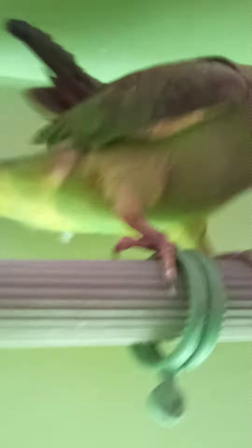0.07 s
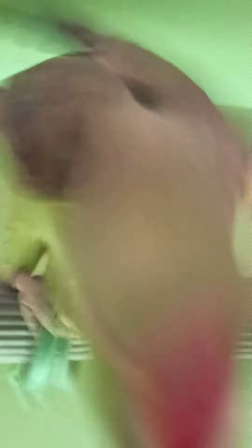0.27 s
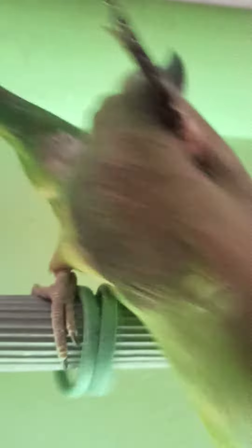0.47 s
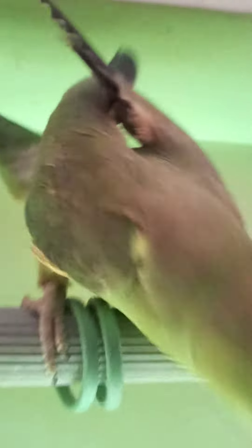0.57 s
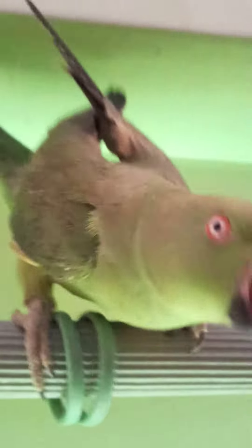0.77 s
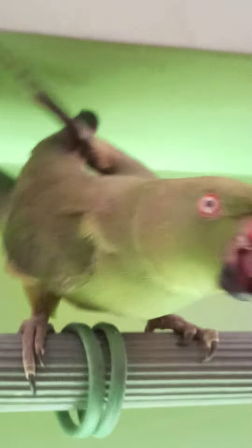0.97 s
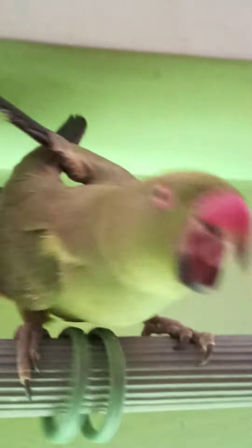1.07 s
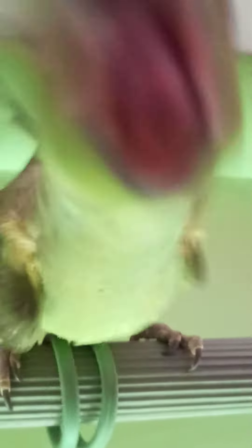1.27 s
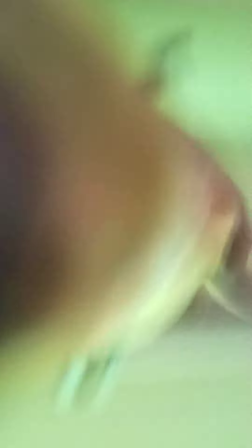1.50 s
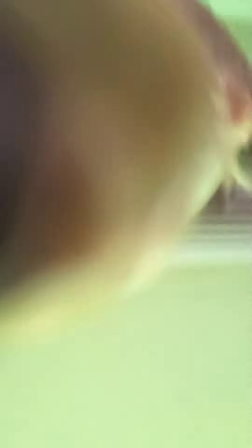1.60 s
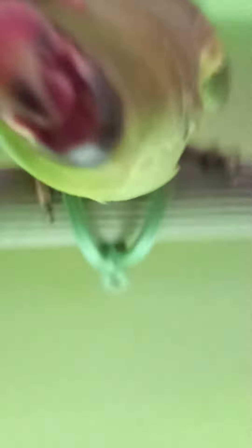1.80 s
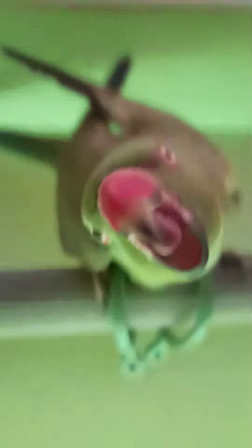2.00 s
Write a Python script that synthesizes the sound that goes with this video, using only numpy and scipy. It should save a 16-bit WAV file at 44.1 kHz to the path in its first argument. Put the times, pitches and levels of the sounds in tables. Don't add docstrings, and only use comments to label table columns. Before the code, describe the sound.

A parrot screeches raspily once, then its beak raps and scratches the microphone's casing in bursts

```python
import sys
import numpy as np
from scipy import signal
from scipy.fft import rfft, irfft, next_fast_len
from scipy.io import wavfile
from scipy.ndimage import map_coordinates

SR = 44100
rng = np.random.default_rng(int(sys.argv[2]) if len(sys.argv) > 2 else 0)


def file_out(sig):
    cols = np.atleast_2d(sig).T
    lim = np.clip(cols, -1, 1)
    pcm = np.round(lim * 32767).astype(np.int16)
    wavfile.write(sys.argv[1], SR, pcm)


def nominal_scale(level):
    x = np.asarray(level, float) / 20
    return 10 ** x


N = 90404


def unit(x):
    return x / np.sqrt(np.mean(x ** 2) + 1e-20)


def along(points, hz):
    f, v = np.transpose(points)
    return np.interp(np.log(hz + 1), np.log(f + 1), v)


def wobble(rate_hz):
    knots = rng.standard_normal(int(N * rate_hz / SR) + 4)
    return map_coordinates(knots, [np.arange(N) * rate_hz / SR])


def filtered(x, response):
    m = next_fast_len(N + SR // 2)
    return irfft(rfft(x, m) * response(np.fft.rfftfreq(m, 1 / SR)), m)[..., :N]


def sides(pan_db):
    return nominal_scale([[min(pan_db, 0)], [-max(pan_db, 0)]])


# freq_hz, level_db [dB per Hz]
AIR_SPECTRUM = [(24, -80.5), (40, -52), (81, -12.5), (123, -10), (198, -5.5), (404, -7.5), (522, -15.5),
                (588, -14.5), (4500, -28), (5850, -53), (9900, -120)]
# freq_hz, level_db [dB per Hz]
AIR_TREBLE = [(4650, -26.5), (4850, -36.5), (5900, -30.5), (6400, -31), (16000, -25)]
# freq_hz, likeness [-1 to 1]
PORT_LIKENESS = [(60, 0.58), (240, 0.69), (950, 0), (3770, 0), (15000, 0.087)]
# freq_hz, level_db [dB rms]
HUM_LINES = [(98, -62), (155, -54), (200, -51.5), (400, -54), (600, -68.5)]


def air_and_hum():
    t = np.arange(N) / SR

    def mid_side(hz):
        turn = np.arccos(np.clip(along(PORT_LIKENESS, hz), -1, 1)) / 2
        return nominal_scale(along(AIR_SPECTRUM[:-2] + AIR_TREBLE, hz)) * [np.cos(turn), np.sin(turn)]

    mid, side = filtered(rng.standard_normal((2, N)), mid_side)
    hum = 0
    for hz, db in HUM_LINES:
        level = nominal_scale(db - 1 + 4.2 * wobble(12.1))
        hum = hum + level * np.sin(2 * np.pi * hz * t + 0.22 * wobble(13))
    air = nominal_scale(-45 + 0.28 * wobble(4.2)) * unit(np.array([mid + side, mid - side]))
    return air + hum * nominal_scale([[-1.2], [1.2]])


# freq_hz, t60_s
ROOM_T60 = [(300, .25), (2000, .24), (8000, .2)]


def room(x):
    hz, t, z = signal.stft(rng.standard_normal((2, SR // 2)), SR, nperseg=256)
    decay = nominal_scale(-60 * t / along(ROOM_T60, hz)[:, None])
    tail = signal.istft(z * decay, SR, nperseg=256)[1]
    delayed = np.pad(x, (200, 0))[None]
    return signal.fftconvolve(delayed, tail / np.linalg.norm(tail[0]), axes=1)[:, :N]


# peak_s, rise_s, fall_s, level_db, pan_db [left over right]
RUSTLES = [
    (1.396, .006, .002, -33, 14),
    (1.436, .012, .015, -38, 10),
    (1.75, .001, .0012, -25, 20),
    (1.76, .006, .005, -28, 18),
    (1.775, .0035, .001, -13, 18),
    (1.56, .06, .06, -46, 8),
    (1.68, .04, .03, -46, 8),
    (1.91, .05, .04, -46, 6),
]
# freq_hz, level_db [dB per Hz]
RASP_SPECTRUM = [(300, 4.5), (1500, 3), (4000, -5), (7000, 4), (16000, -24.5)]


def rustle():
    t = np.arange(N) / SR
    swell = 0
    for peak_s, rise_s, fall_s, db, pan_db in RUSTLES:
        away = np.maximum((peak_s - t) / rise_s, (t - peak_s) / fall_s)
        swell = swell + nominal_scale(db) * sides(pan_db) * np.exp(-away ** 1.3)
    noise = unit(filtered(rng.standard_normal((2, N)), lambda hz: nominal_scale(along(RASP_SPECTRUM, hz))))
    grain = nominal_scale(3.85 * wobble(300))
    return swell * noise * grain


# start_s, crack_db, thud_db, thud_hz, pan_db [thud, left over right]
KNOCKS = [(.941, -42, -70, 400, 3), (.978, -29, -60, 400, 3), (1.3755, -46, -29, 900, 10),
          (1.3815, -42, -27, 900, 10), (1.3882, -6, 0, 420, 22), (1.3965, -18, -10, 400, 20),
          (1.4097, -9, -6, 380, 22), (1.428, -46, -30, 700, 12), (1.435, -42, -25, 800, 10),
          (1.438, -30, -15, 900, 20), (1.448, -48, -30, 700, 15), (1.4817, -15, -18, 350, 8),
          (1.7375, -42, -22, 500, 8), (1.7522, -9, -6, 900, 14), (1.7542, 0, -1, 650, 8),
          (1.7755, 2, 3, 560, 14), (1.776, -8, -5, 300, -4), (1.784, -60, -9, 500, 20)]


def knocks():
    crack_t60_s, thud_cycles, case_lag_s = .0045, 6.5, .0012
    shell_hz, shell_db, shell_t60_s = 1104, -3, 0.0064
    out = np.zeros((2, N + SR))
    t = np.arange(SR // 20) / SR
    late = np.maximum(t - [[0], [case_lag_s]], 0)
    for start_s, crack_db, thud_db, thud_hz, pan_db in KNOCKS:
        hz = thud_hz * np.array([[1], [0.49 if pan_db > 0 else 1]])
        crack = nominal_scale(crack_db - 60 * t / crack_t60_s) * rng.standard_normal((2, len(t)))
        crack = crack * sides(min(12, abs(pan_db)))
        glide = 1 + 0.52 * np.exp(-late / 0.0023)
        decay = nominal_scale(thud_db + 3 - 60 * late * hz / thud_cycles)
        rise = 1 - np.exp(-late * hz / 0.21)
        thud = -np.sin(2 * np.pi * hz * late * glide) * decay * rise
        shell = np.sin(2 * np.pi * shell_hz * late) * nominal_scale(thud_db + shell_db - 60 * late / shell_t60_s)
        out[:, round(start_s * SR):][:, :len(t)] += crack + (thud - shell) * sides(pan_db)
    return out[:, :N]


def around_head(x):
    taps = rng.standard_normal((2, 200)) * nominal_scale(-17.5 - 60 * np.arange(200) / SR / 0.013)
    taps[:, 0] = nominal_scale([-1.2, 0.8])
    return signal.fftconvolve(x, taps, axes=1)[:, :N]


# start_s, level_db, pitch_hz, beak_hz [resonance], bright_db, roughness [0-1]
SQUAWK = [
    (0.244, -19.5, 1652, 3300, -5.5, 0.15),
    (.295, -21.5, 1667, 4500, -3.5, 0.19),
    (0.326, -22.5, 1680, 3300, 0, 0.17),
    (0.383, -17.5, 1700, 3730, -1, .2),
    (.42, -24, 1657, 4000, -6.5, .2),
    (.44, -21, 1592, 4650, -6, .2),
    (0.497, -21, 1568, 4500, -1, .3),
    (.535, -19.5, 1528, 4400, -11, 0.28),
    (0.598, -20, 1523, 4860, -21, .4),
]


def squawk():
    t = np.arange(N) / SR
    start_s, *cols = np.transpose(SQUAWK)
    level_db, pitch, beak, bright_db, rough = [np.interp(t, start_s, c) for c in cols]

    end_s, croak_half_s = .661, .011
    age = t - .2433
    slack = t > end_s - croak_half_s
    cycle = 150 * age - 80 * np.abs(age) ** 2.6 + 0.11 * rough * wobble(60)
    from_centre_s = (cycle - np.round(cycle)) / np.gradient(cycle) / SR
    open_s = .0056 - .0035 * age
    u = from_centre_s / open_s * 2
    u = np.where(slack, (t - end_s) / croak_half_s, u)
    swing = np.abs(np.cos(np.pi / 2 * np.clip(u, -1, 1)))
    leak = nominal_scale(-16 - 900 * np.maximum(t - end_s, 0))
    scatter_db = 3.5 * rough * wobble(150)
    croak_db = slack * (-7 + 5 * wobble(300))
    gate = swing * nominal_scale(scatter_db + croak_db) + leak

    arch = (.33 + .12 * rough) * np.minimum(u ** 2, 1.1) * np.where(slack, .3, 1)
    hz = pitch * np.where(slack, .68, 1) * (1 - arch + 0.0947 * rough * wobble(500))
    turn = 2 * np.pi * np.cumsum(hz) / SR

    def bump(f, centre_hz, width_hz):
        return 1 / (1 + ((f - centre_hz) / width_hz) ** 2) ** 2

    def mouth(f, at):
        valley = nominal_scale(-7) * (bump(f, 3210, 1600) + 0.12 * bump(f, 1600, 400))
        upper = nominal_scale(bright_db[at]) * bump(f, 6850, 2900)
        return bump(f, beak[at], 880) + valley + upper

    def drift():
        return np.array([2 * rough * wobble(900) + wobble(25.5) for port in "LR"])

    first_level = nominal_scale(-6.5) * (swing ** 0.41 + leak / 2) * nominal_scale(-5 * slack) * (pitch / hz) ** 1.5
    port_phase = .7 * np.array([[1], [-1]]) + .35 * drift()
    smear = 2.5 * (rough + slack / 2) * wobble(350)
    first = first_level * np.sin(turn + port_phase + smear)
    overtones = sum(mouth(k * hz, ...) * np.sin(k * turn + drift()) for k in range(2, 9))

    f, s, z = signal.stft(rng.standard_normal((2, N)), SR, nperseg=128)
    at = np.minimum(s * SR, N - 1).astype(int)
    f = f[:, None]
    hiss = nominal_scale(-6 - 109 * np.maximum(s - .42, 0)) * (f > 9000)
    shape = mouth(f, at) * (f > 600) * (f < 9000) + hiss
    breath = signal.istft(z * shape, SR, nperseg=128)[1][:, :N]
    breath = nominal_scale(-4) * 5 * np.sqrt(rough) * breath

    fade_db = 241 * np.maximum(t - .61, 0)
    onset_db = 3500 * np.maximum(SQUAWK[0][0] - t, 0)
    return nominal_scale(level_db + 8.0 - fade_db - onset_db) * (first + gate * (overtones + breath))


def scene():
    voice = squawk()
    bird = around_head(voice) + nominal_scale(-14) * room(voice.mean(0))
    return bird + knocks() + rustle() + air_and_hum()


# freq_hz, gain_db
PHONE_COLOUR = [(30, -14), (90, 1.5), (4700, 1.5), (5400, -6.5), (6300, 1.5), (7650, 4.5), (7850, -6),
                (8400, -3.5)]
# freq_hz, gain_db
PHONE_TREBLE = [(8400, 0.5), (8900, -32.5), (11400, -62), (11600, -9), (15750, -10.5), (16000, -23.5),
                (17000, -63)]


def phone_colour(x):
    return filtered(x, lambda hz: nominal_scale(along(PHONE_COLOUR, hz) + along(PHONE_TREBLE, hz)))


def low_pass(x):
    return signal.sosfilt(signal.butter(12, 16810, fs=SR, output="sos"), x)


def record(dry):
    duck_db, duck_at_db, release_s, ceiling = 7, -28, .02, .88
    x = phone_colour(dry)
    keep = np.exp(-1 / (release_s * SR))
    power = signal.lfilter([1 - keep], [1, -keep], np.mean(x ** 2, 0))
    x = x * nominal_scale(-duck_db * power / (power + nominal_scale(2 * duck_at_db)))
    mix = x / (1 + (x / ceiling) ** 10) ** (1 / 10)
    return low_pass(mix)


dry = scene()
out = record(dry)
file_out(out)
```